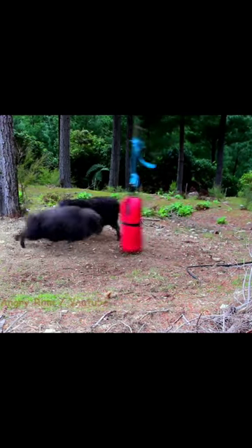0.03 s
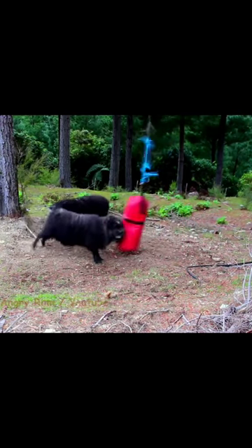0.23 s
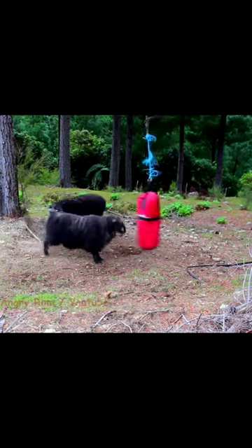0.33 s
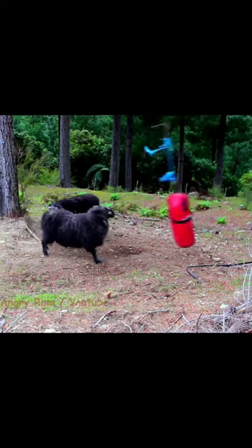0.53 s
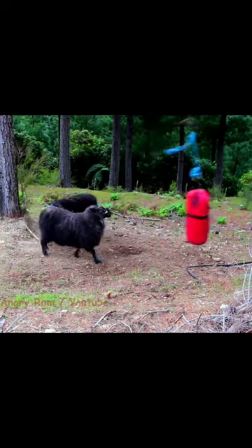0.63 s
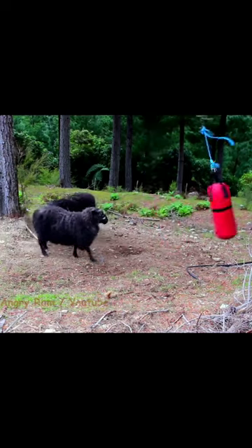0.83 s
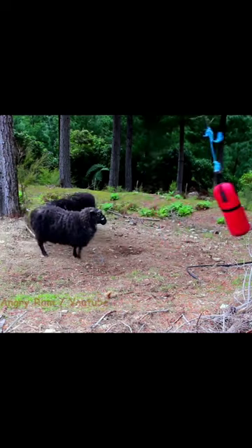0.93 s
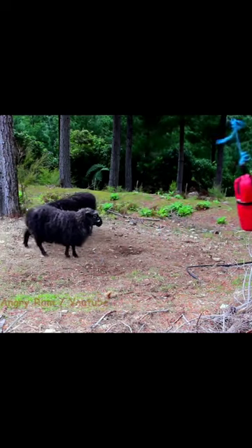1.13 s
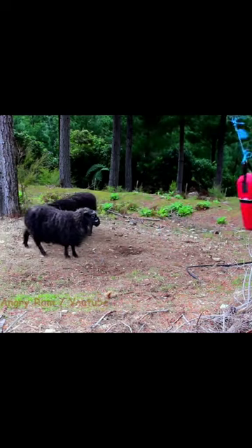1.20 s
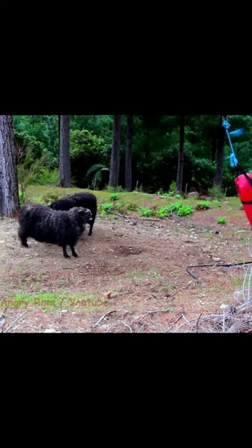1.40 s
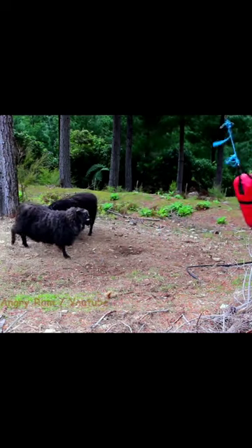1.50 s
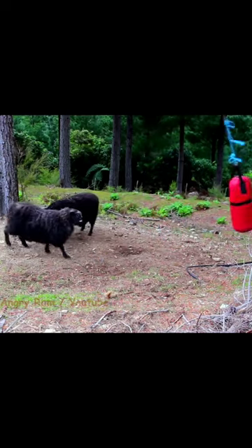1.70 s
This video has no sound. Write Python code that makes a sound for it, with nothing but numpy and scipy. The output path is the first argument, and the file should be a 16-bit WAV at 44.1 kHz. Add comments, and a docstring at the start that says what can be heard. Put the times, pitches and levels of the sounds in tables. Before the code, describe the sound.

A ram hits a punching bag with a hard thud while a forest bird warbles.

```python
"""A ram charges a punching bag hanging in a forest clearing: a double thud of forehead and horns.
Each impact excites the damped modes of the padded bag, with a slap and crunch of cover and filling.
Hooves thump and scuff on dry, twiggy ground, and a songbird warbles in a frequency-modulated whistle.
The trees scatter the sounds of both animals into reverberation; the air rushes faintly."""
import sys
import numpy as np
from scipy import signal
from scipy.io import wavfile

SR = 44100
rng = np.random.default_rng(int(sys.argv[2]) if len(sys.argv) > 2 else 0)


def generate_wav(signal):
    """Clip the signal to [-1, 1] and save it as 16-bit WAV at the path in sys.argv[1]."""
    frames = np.transpose(np.atleast_2d(signal))
    scaled = np.clip(frames, -1, 1) * 32767
    pcm = np.round(scaled).astype(np.int16)
    wavfile.write(sys.argv[1], SR, pcm)


N = 77175
T = np.arange(N) / SR
CONTACT_S = 0.00073


def from_db(db):
    """Amplitude ratio of a level in decibels."""
    return 10 ** (np.asarray(db) / 20)


def unit_rms(x):
    """Normalisation to unit mean power."""
    return x / np.sqrt(np.mean(x ** 2) + 1e-20)


def at_hz(points, hz):
    """Interpolation on a logarithmic frequency axis."""
    freqs, values = np.transpose(points)
    return np.interp(np.log(hz), np.log(freqs), values)


def pan(db):
    """Interchannel level difference: gains for left over right by db."""
    return from_db(np.array([[db], [-db]]) / 2)


def drift(hz):
    """Random fluctuation: noise low-passed at hz, with rms 1."""
    pole = np.exp(-2 * np.pi * hz / SR)
    return unit_rms(signal.lfilter([1], [1, -2 * pole, pole * pole], rng.standard_normal(2 * N))[N:])


def decay(start, t60):
    """Exponential decay from start, by 60 dB in t60 seconds."""
    return (T >= start) * np.exp(-np.log(1000) * np.maximum(T - start, 0) / t60)


def mode(start, hz, t60):
    """Damped oscillation, excited through a soft contact."""
    onset = np.clip((T - start) / CONTACT_S, 0, 1)
    return onset * decay(start, t60) * np.cos(2 * np.pi * hz * (T - start - CONTACT_S / 2))


def stereo(mid, side, correlation):
    """Mid-side mixing sets the correlation of two channels."""
    correlation = np.clip(correlation, -1, 1)
    return np.sqrt(1 + correlation) * mid + np.sqrt(1 - correlation) * side * np.array([[1], [-1]])


# Coherence of the noise. Each row: frequency in Hz, left-right correlation.
COHERENCE = [(100, 0.84), (400, 0.68), (1200, 0.66), (3000, 0.35), (6000, 0.92), (12000, 1)]

def noise(spectrum, grain_db, flicker_db):
    """Amplitude-modulated noise of rms 1: fast grains, and a slow flicker in each half-octave band."""
    edges, run_in = 22 * 2 ** np.arange(0, 9.6, .5), 8000
    white = rng.standard_normal((2, 2, run_in + N))
    white[..., run_in:] *= from_db(grain_db * np.clip(drift(267), -2, 2))
    out = 0
    for k, (low, high) in enumerate(zip(edges, edges[1:])):
        band = signal.butter(2, [low, high], "band", fs=SR, output="sos")
        mid, side = signal.sosfilt(band, white[k % 2])[:, run_in:]
        hz = np.sqrt(low * high)
        gain = from_db(at_hz(spectrum, hz) + flicker_db * drift(4.95))
        out = out + gain * stereo(mid, side, at_hz(COHERENCE, hz))
    return unit_rms(out)


# Spectrum of the air. Each row: frequency in Hz, relative spectral density in dB.
AIR_SPECTRUM = [(25, -32), (55, 2), (150, -0.5), (370, -2), (600, -1), (950, 0), (1400, -6.5), (2200, -11),
                (3500, -8), (5300, -15.5), (9000, -22), (14000, -31)]
# Swell of the air. Each row: time in seconds, level in dB.
AIR_LEVELS = [(0, -52), (.6, -50), (1.2, -52), (1.75, -52)]

def air():
    """Moving air radiates broadband noise, strongest at low frequencies."""
    level_db = np.interp(T, *np.transpose(AIR_LEVELS))
    return from_db(level_db) * noise(AIR_SPECTRUM, grain_db=0, flicker_db=1)


def trees(x, t60, correlation, near_gain, near_t60):
    """Multiple scattering by trunks gives dense early echoes and a long reverberant tail."""
    build_up = 1 - np.exp(-T / 0.0072)
    envelope = build_up * (decay(0, t60) + near_gain * decay(0, near_t60))
    response = unit_rms(stereo(*rng.standard_normal((2, N)), correlation) * envelope) / np.sqrt(N)
    return signal.fftconvolve(x[None], response, axes=1)[:, :N]


def arch(u, roundness=0.574):
    """Pitch glide from a note's edge (u = 0) to its peak (u = 1), part line and part sine."""
    return (1 - roundness) * u + roundness * np.sin(np.pi / 2 * u)


# Bird notes. Each row: start, rise time and fall time in seconds, first, peak and last pitch in Hz,
# direct level in dB, scattered level at mid-fall in dB.
BIRD_NOTES = [(0.018, 0.0355, 0.02, 3800, 4670, 4170, -52, -51.5),
              (0.144, 0.012, 0.01503, 2900, 4760, 2966, -46, -39.5),
              (0.17, 0.017, 0.0023, 3000, 4210, 4200, -47.5, -44),
              (0.194, 0.023, 0.0145, 2750, 3420, 3200, -38.5, -47),
              (0.337, 0.0133, 0.018, 3600, 4300, 3305, -52, -45),
              (0.442, 0.014, 0.017, 3700, 4750, 3746, -50, -45.5),
              (0.488, 0.012, 0.033, 2950, 3990, 2790, -50.5, -49),
              (0.603, .013, .017, 3700, 4650, 3980, -51, -50.5),
              (0.646, 0.011, 0.027, 3150, 3880, 2770, -51.5, -45.5),
              (0.764, .012, 0.014, 3500, 4700, 3750, -48, -45.5),
              (0.808, 0.014, 0.022, 2950, 3900, 2530, -51, -42),
              (0.924, 0.016, 0.016, 3300, 4550, 3520, -49, -44),
              (0.967, 0.014, .030, 2700, 3406, 2240, -49, -43),
              (1.084, 0.0074, 0.0127, 4410, 5200, 4700, -56, -50),
              (1.103, 0.011, .016, 3500, 4550, 3434, -47, -41.5),
              (1.146, 0.014, 0.029, 2650, 3170, 2095, -51, -44.5),
              (1.194, 0.0098, 0.017, 3700, 4850, 3040, -50.5, -45.5),
              (1.211, 0.01, 0.0027, 3200, 3670, 3900, -42, -41),
              (1.232, 0.022, 0.025, 2500, 3400, 2980, -43.5, -48.5),
              (1.295, 0.012, 0.019, 3400, 4650, 3307, -46, -44.5),
              (1.333, 0.019, 0.034, 2350, 3046, 1990, -52, -50)]
NOTE_EDGE_S, FALL_FADE_S, FALL_SCATTER_DB = 0.0016, 0.045, 8.5
WAVER_DEPTH, FLUTTER_DB = 0.0239, 3

def bird():
    """Frequency modulation of a near-pure whistle; returns the sound sent to the trees and the direct."""
    to_trees, direct = np.zeros(N), np.zeros(N)
    waver = 1 + WAVER_DEPTH * drift(235)
    for start, rise, fall, first_hz, peak_hz, last_hz, direct_db, scattered_db in BIRD_NOTES:
        up = np.clip((T - start) / rise, 0, 1)
        down = np.clip((T - start - rise) / fall, 0, 1)
        hz = first_hz + (peak_hz - first_hz) * arch(up) + (last_hz - peak_hz) * (1 - arch(1 - down))
        envelope = np.clip(np.minimum(T - start, start + rise + fall - T) / NOTE_EDGE_S, 0, 1)
        note = envelope * np.sqrt(2) * np.sin(2 * np.pi * np.cumsum(hz * waver) / SR)
        # As a note falls, more goes into the trees and the direct sound fades.
        to_trees += from_db(scattered_db + FALL_SCATTER_DB * (down - .5)) * note
        direct += from_db(direct_db) * note * np.exp(-(fall * down / FALL_FADE_S) ** 2)
    return to_trees, direct * from_db(FLUTTER_DB * drift(150))


# Hoof falls. Each row: start in seconds, thump level in dB, pitch in Hz, grit level in dB.
HOOF_FALLS = [(0.049, -43, 184, -74.5), (0.082, -37.5, 173, -77), (0.174, -44, 130, -52),
              (0.262, -26, 145, -42.5), (0.289, -32, 135, -49), (0.307, -30, 220, -51.5),
              (0.397, -36, 284, -49), (0.427, -30.5, 207, -53), (0.447, -35.5, 76, -68),
              (1.216, -50, 54, -51.5), (1.42, -97, 166, -54), (1.455, -47, 407, -54),
              (1.498, -45, 385, -73)]
# Snapping twigs and dry needles. Each row: start in seconds, level in dB.
TWIG_SNAPS = [(0.409, -63), (0.64, -44), (1.089, -48.5), (1.67, -48), (1.692, -55)]
# Spectra of grit and twigs. Each row: frequency in Hz, relative spectral density in dB.
GRIT_SPECTRUM = [(100, -14), (400, -12), (1000, -7.5), (2000, -6.5), (4000, -12), (7000, -24), (15000, -37)]
TWIG_SPECTRUM = [(300, -31), (1500, -1.5), (4000, 3.5), (7000, -8), (10000, -16.5), (15000, -23)]

def hooves():
    """Impacts on soil ring with heavy damping; scattered grit and breaking twigs give noise bursts."""
    thumps = sum(from_db(db) * mode(start, hz, t60=0.025) for start, db, hz, _ in HOOF_FALLS)
    scuffs = sum(from_db(db) * decay(start, t60=0.16) for start, _, _, db in HOOF_FALLS)
    snaps = sum(from_db(db) * decay(start, t60=0.072) for start, db in TWIG_SNAPS)
    crackle = noise(TWIG_SPECTRUM, grain_db=3, flicker_db=1.5)
    grit = noise(GRIT_SPECTRUM, grain_db=1.5, flicker_db=4.0)
    return thumps + scuffs * grit + snaps * crackle


# Blows on the bag. Each row: start in seconds, polarity of the thump (+1 or -1),
# thump, slap and crunch levels in dB. The last row is the second hard blow.
BAG_BLOWS = [(0.2055, 1, -22, -15, -33.5), (0.2220, 1, -33, -20, -37.5), (0.2312, -1, -19.5, -14, -30)]
# Modes of the padded bag. Each row: frequency in Hz, level relative to the thump in dB, T60 in seconds.
BAG_MODES = [(43, -28, 0.21), (105, -17, 0.19), (121.3, 2.5, 0.063), (175, -13, 0.098), (268.5, -11, 0.12),
             (565, -12, 0.057), (754, -21, 0.078), (901, -11, 0.098), (1070, -4, 0.027),
             (1203, -15.5, 0.12), (1314, -12, 0.044)]
# Crunch of cover and filling. Each row: frequency in Hz, relative spectral density in dB.
CRUNCH_SPECTRUM = [(60, -28), (130, 14), (250, -6.5), (500, 6), (1000, -2), (2000, 5), (3500, -6),
                   (5000, -15), (7200, -19), (9000, -41), (15000, -53)]
CRUNCH_RISE_S, CRUNCH_T60_S = 0.0035, 0.13

def bag():
    """Modal superposition: each blow rings the padding, slaps the cover and crunches the filling."""
    body, crush = 0, 0
    for start, polarity, thump_db, slap_db, crunch_db in BAG_BLOWS:
        thump = sum(from_db(thump_db + db) * mode(start, hz, t60) for hz, db, t60 in BAG_MODES)
        slap = from_db(slap_db) * mode(start + CONTACT_S, hz=815, t60=0.0059)
        body = body + polarity * thump + slap
        onset = np.clip((T - start) / CRUNCH_RISE_S, 0, 1)
        crush = crush + from_db(crunch_db) * onset * decay(start, CRUNCH_T60_S)
    return body + crush * noise(CRUNCH_SPECTRUM, grain_db=-2.5, flicker_db=-0.5)


def scene():
    """Superposition of moving air with the direct and scattered sound of ram and bird."""
    background = air()
    ram = bag() + hooves()
    song_to_trees, song_direct = bird()
    ram_echo = from_db(-12.5) * trees(ram.mean(0), t60=0.77, correlation=1, near_gain=0.91, near_t60=0.045)
    song_echo = trees(song_to_trees, t60=0.84, correlation=0.61, near_gain=1.23, near_t60=0.1)
    return background + ram + ram_echo + pan(-2.5) * song_direct + pan(-1.5) * song_echo


def record(dry):
    """Band limiting: an elliptic low-pass cuts steeply above 14.4 kHz."""
    return signal.sosfilt(signal.ellip(10, .1, 80, 14400, fs=SR, output="sos"), dry)


dry = scene()
out = record(dry)
generate_wav(out)
```